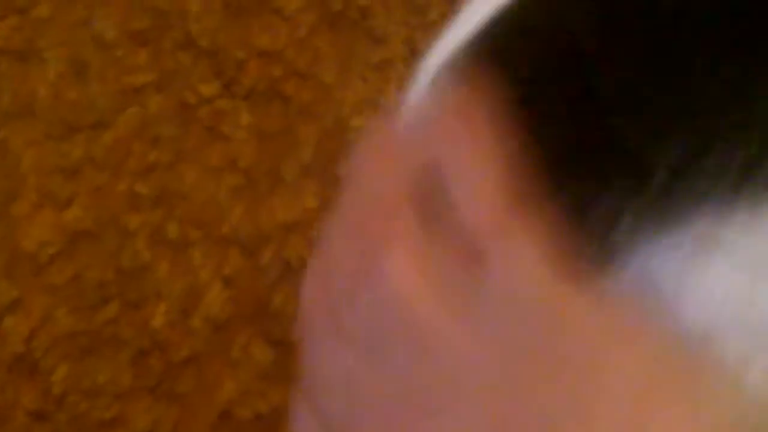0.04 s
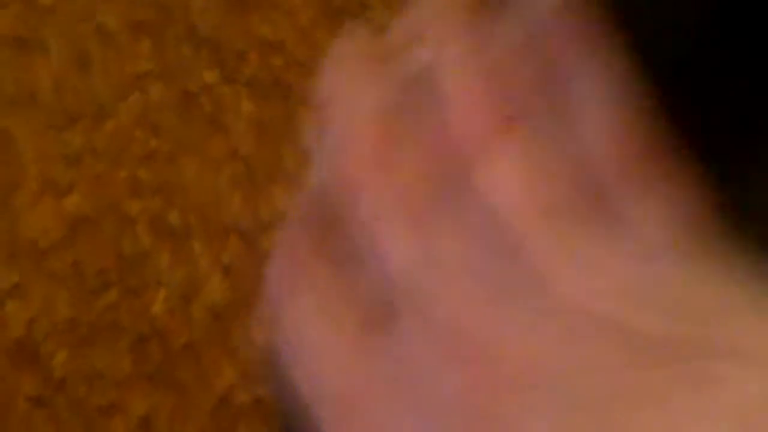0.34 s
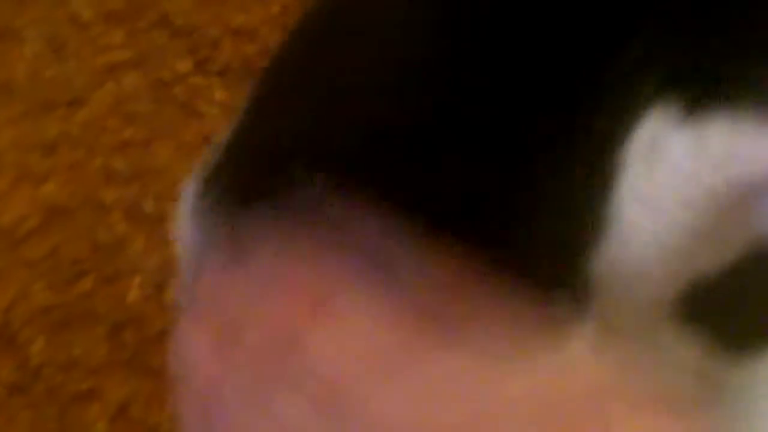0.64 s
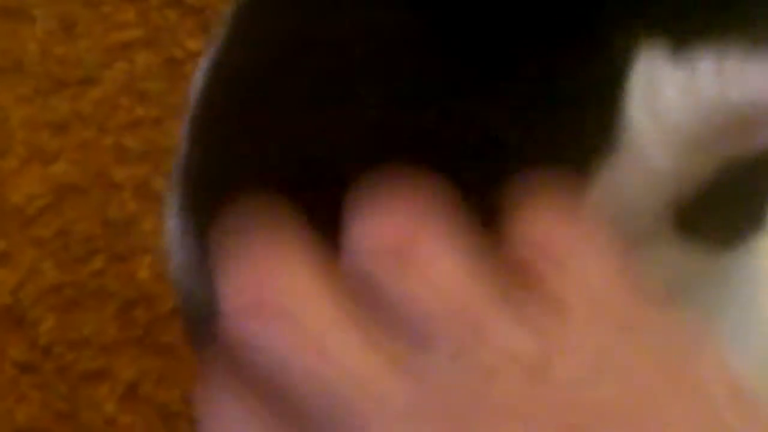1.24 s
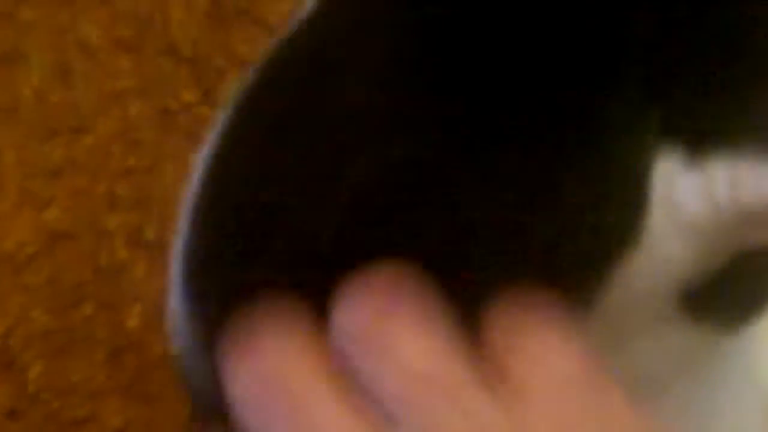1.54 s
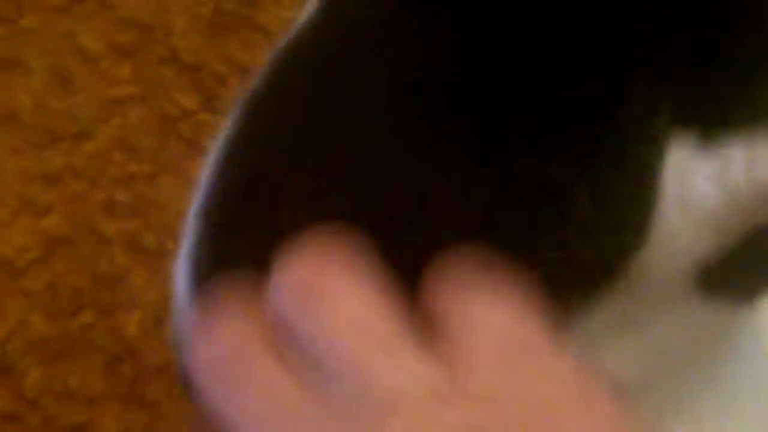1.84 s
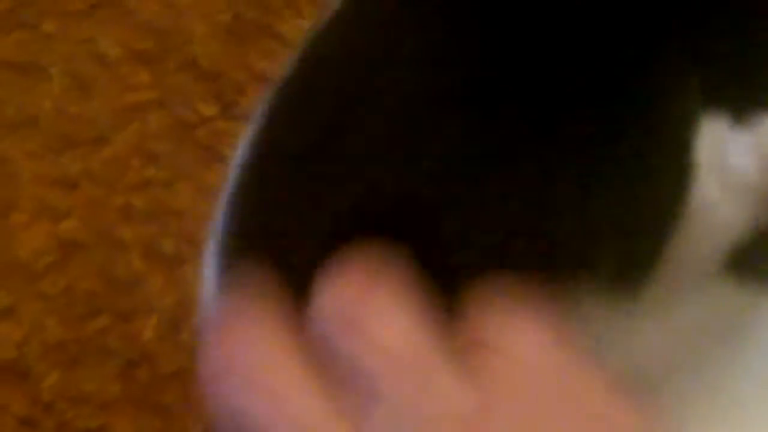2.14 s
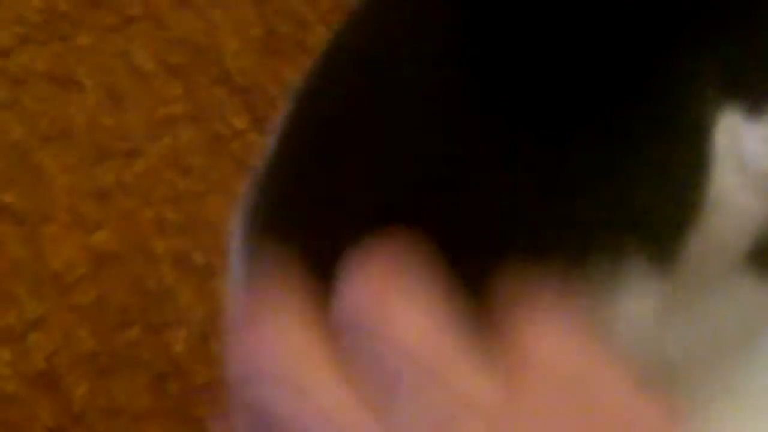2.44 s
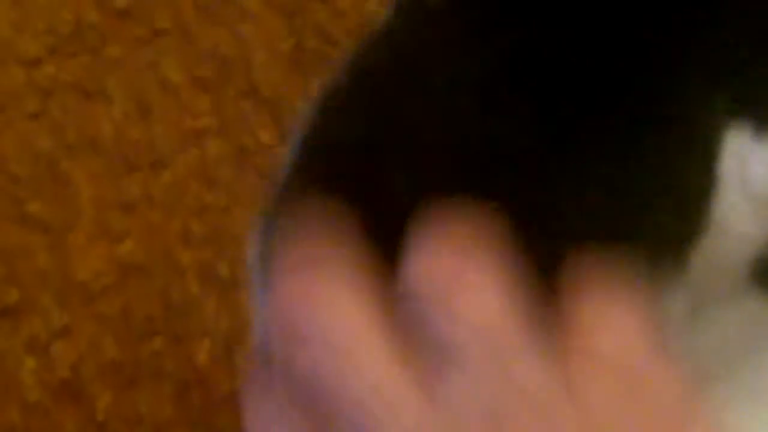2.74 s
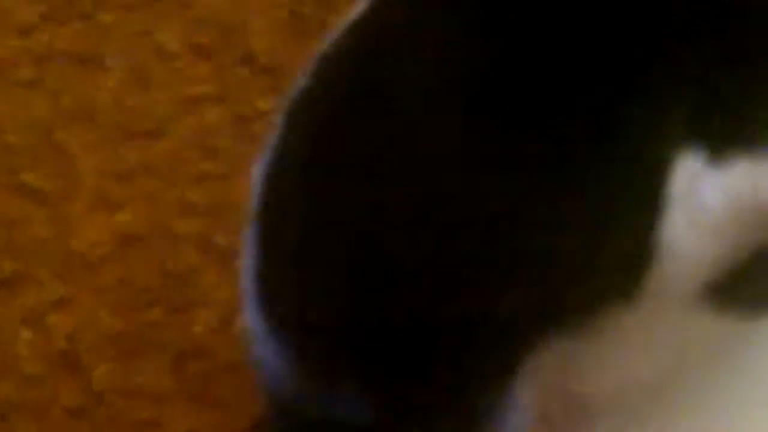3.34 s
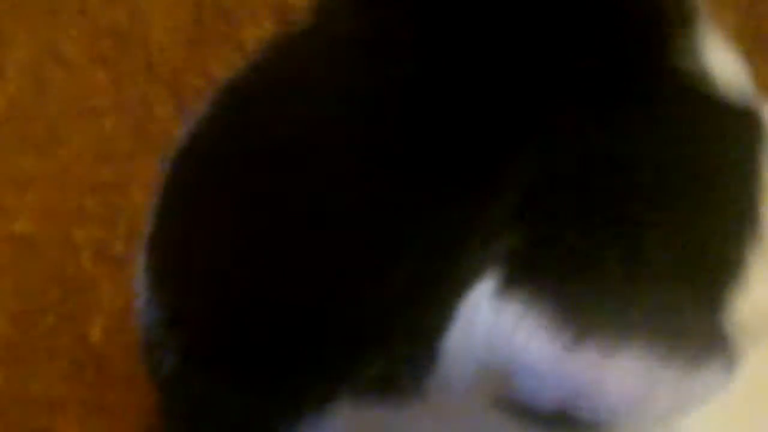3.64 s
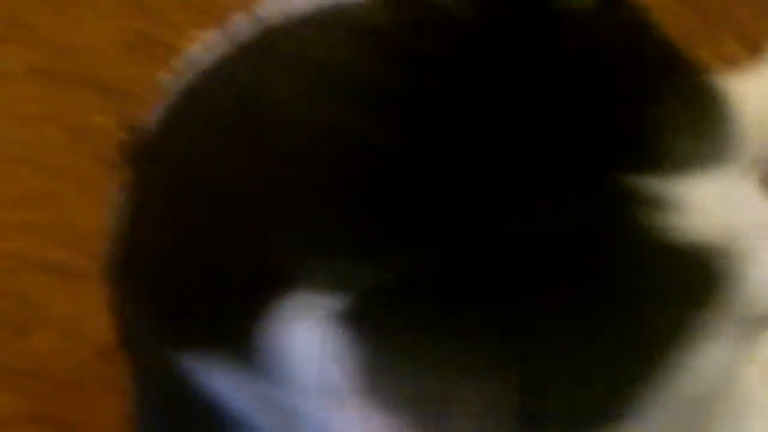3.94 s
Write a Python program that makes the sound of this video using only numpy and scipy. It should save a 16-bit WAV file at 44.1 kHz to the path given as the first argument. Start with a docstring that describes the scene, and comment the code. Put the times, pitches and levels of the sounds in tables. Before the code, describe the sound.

A hand rubs a cat's fur in quick, soft swishes close to a handheld microphone. A few dull bumps and pats come early, and small plastic ticks near the end, while an appliance hums faintly in a carpeted room.

```python
"""Soft swishes of fur, about seven a second: a hand rubs a cat's back to and fro, close to a handheld
camera. Hairs slide and flick under the fingers, the palm scuffs the coat, and hand and cat make a few
dull bumps and hollow pats. The camera's plastic case ticks in the grip, most clearly as the stroking
dies away. Behind it all, an appliance hums in the carpeted room."""
import sys
import numpy as np
from scipy import signal
from scipy.fft import rfft, irfft
from scipy.io import wavfile

SR = 44100
rng = np.random.default_rng(int(sys.argv[2]) if len(sys.argv) > 2 else 0)


def log_audio(samples):
    """Write samples as a 16-bit WAV file to the path given in sys.argv[1]."""
    # one column per channel
    frames = np.atleast_2d(samples).T
    # limit to full scale, then quantise
    limited = np.clip(frames, -1, 1)
    pcm = np.round(limited * 32767).astype(np.int16)
    wavfile.write(sys.argv[1], SR, pcm)


N = 176400
TIME_S, FREQ_HZ = np.arange(N) / SR, np.fft.rfftfreq(N, 1 / SR)


def amp(db):
    """Decibels to gain."""
    return 10 ** (np.asarray(db) / 20)


def unit_rms(x):
    """Scales to rms 1."""
    return x / np.sqrt(np.mean(x ** 2) + 1e-20)


def curve(points):
    """Joins a table's points across the spectrum on a log-frequency axis."""
    hz, value = np.transpose(points)
    return np.interp(np.log(FREQ_HZ + 1), np.log(hz + 1), value)


def equalise(x, eq):
    """Shapes a signal with an EQ curve."""
    return irfft(rfft(x) * amp(curve(eq)), N)


def drift(rate_hz):
    """Smooth random wander of rms 1."""
    return unit_rms(irfft(rfft(rng.standard_normal(N)) * np.exp(-(FREQ_HZ / rate_hz) ** 2), N))


def triggers(per_s, samples=N):
    """Single-sample triggers at random moments."""
    return rng.random(samples) < per_s / SR


def swell(middle_s, length_s, flatness=3.1):
    """One move of the hand gathers speed, peaks and slows; length_s is its width at half height."""
    return np.exp(-np.log(2) * abs(2 * (TIME_S - middle_s) / length_s) ** flatness)


def add(mix, start_s, sound):
    """Mixes a sound in at a time."""
    part = mix[max(round(start_s * SR), 0):][:len(sound)]
    part += sound[:len(part)]


# Tone of the air and hiss: freq_hz, gain_db
ROOM_EQ = [(5, -4), (28, -1.5), (45, -5.5), (75, -14.5), (170, -15.5), (270, -23.5), (450, -25.5),
           (580, -30), (820, -31), (1300, -36), (1850, -37), (2200, -38.5), (4000, -42), (6500, -39.5),
           (9000, -48), (12500, -50), (13300, -67), (15000, -63)]
# How alike left and right are: freq_hz, correlation (1 = mono)
ROOM_CORRELATION = [(50, 0.96), (170, 0.97), (350, 0.81), (700, 0.89), (1500, 0.96), (4000, 1), (7000, 1),
                    (12000, 0.67)]


def room_tone(level_db=-50.5):
    """Steady stereo air of the room, fading into microphone hiss at the top."""
    mid, side = rfft(rng.standard_normal((2, N)))
    correlation = curve(ROOM_CORRELATION)
    mid *= np.sqrt((1 + correlation) / 2)
    side *= np.sqrt((1 - correlation) / 2)
    air = irfft(np.array([mid + side, mid - side]), N)
    return amp(level_db) * unit_rms(equalise(air, ROOM_EQ))


# Motor and mains tones: pitch_hz, rms_db
HUM_TONES = [(46.8, -54), (58.4, -43), (102.3, -59), (120, -44), (145.6, -60), (204.8, -69.5), (233.3, -66),
             (307, -76.5), (410.5, -77.5), (442, -78.5), (467, -79.5), (817, -79.5), (1109, -83.5),
             (1750, -84.5), (1866, -81.5), (1924, -86)]


def appliance_hum(waver_db=1, waver_rad=0.092, whine_hz=7880, whine_db=-80.5):
    """Slightly wavering motor and mains tones under a thin electronic whine."""
    phase_per_hz, hum = 2 * np.pi * TIME_S, np.zeros(N)
    for hz, db in HUM_TONES:
        gain = amp(db + waver_db * drift(rate_hz=2.27))
        phase = hz * phase_per_hz + 2 * np.pi * rng.random()
        hum += gain * np.sin(phase + waver_rad * drift(rate_hz=2.5))
    whine = amp(whine_db) * np.sin(whine_hz * phase_per_hz)
    return np.sqrt(2) * (hum + whine)  # rms to peak


def handling_rumble(level_db=-48, cutoff_hz=34.5, waver_db=1):
    """Uneven low noise from the hand that holds the camera."""
    lows = signal.sosfilt(signal.butter(2, cutoff_hz, fs=SR, output="sos"), rng.standard_normal(N))
    return amp(level_db) * unit_rms(lows * amp(waver_db * drift(rate_hz=8.2)))


# Tone of the bounce off floor and furniture: freq_hz, gain_db
REFLECTION_EQ = [(30, -25), (120, -7), (300, 5), (2500, -4), (6000, -14), (14000, -15)]


def reflections(x, send_db=-4, t60_s=0.034, echoes_per_s=1500):
    """Early echoes make the short, dead tail of a carpeted room."""
    t = np.arange(SR // 5) / SR
    echoes = rng.choice([-1., 1.], len(t)) * triggers(echoes_per_s, len(t)) * amp(-60 * t / t60_s)
    echoes /= np.linalg.norm(echoes)
    return amp(send_db) * signal.fftconvolve(equalise(x, REFLECTION_EQ), echoes)[:N]


# Modes of the camera's case: pitch_hz, level_db, t60_s
CASE_MODES = [(1690, -7, 0.014), (2030, -1.5, 0.014), (2193, -3.5, 0.019), (3600, -10, .024),
              (6370, -4, 0.013), (7246, -14, 0.012)]


def case_ring():
    """The short ring of the plastic case."""
    t = np.arange(SR // 10) / SR
    return sum(amp(db - 60 * t / t60_s) * np.sin(2 * np.pi * hz * t) for hz, db, t60_s in CASE_MODES)


# Tone of the creak: freq_hz, gain_db
CREAK_EQ = [(300, 0), (660, 11), (1050, -3), (1550, 6), (2050, 5), (2800, -12), (3800, 7), (4600, -12),
            (7000, -8), (14000, -12)]


def grip_creak(peak_s=3.651, level_db=-49, build_s=0.011, release_s=0.0014, slips_per_s=700, spread_db=3):
    """The grip shifts: a run of dull slips builds up, rings the case and lets go."""
    t = TIME_S - peak_s
    slips = rng.choice([-1., 1.], N) * amp(spread_db * rng.standard_normal(N)) * triggers(slips_per_s)
    envelope = np.exp(np.minimum(t / build_s, -t / release_s))
    creak = equalise(signal.oaconvolve(slips * envelope, case_ring())[:N], CREAK_EQ)
    return amp(level_db) * creak * np.linalg.norm(envelope) / (np.linalg.norm(creak) + 1e-12)


# Ticks of the case: start_s, relative_level_db, centre_hz, half_width_octaves, ring_send_db
CASE_TICKS = [(0.5678, -45.5, 9000, 1.2, -8), (0.5682, -48, 1650, 0.46, -4),
              (.8795, -43.5, 5600, 0.52, -14), (0.884, -56, 4000, 1.5, -12), (1.1825, -48, 3200, 1, -15),
              (1.186, -49.5, 4500, 1.3, -13), (2.291, -53, 7000, 0.77, -1), (2.521, -52, 4000, 0.17, -14),
              (3.166, -51.5, 5470, 0.85, -11), (3.357, -51.5, 8000, 0.98, -7),
              (3.538, -53, 7000, 0.79, -12), (3.6144, -39.5, 7250, 0.43, 6.5), (3.6245, -53, 7000, 1, -10),
              (3.6455, -45, 1950, 0.56, 1), (3.6572, -48.5, 6700, 0.33, -1), (3.6655, -50, 2500, 1.3, -16),
              (3.816, -53.5, 7500, 0.56, 5.5), (3.8665, -36.5, 3880, 1.05, -7),
              (3.9905, -39, 2900, 0.27, -19), (3.9925, -38, 7460, .6, -3)]
# Tone of a tick before its band-pass: freq_hz, gain_db
TICK_EQ = [(200, -14), (900, 10.5), (1800, 0), (3200, 5.5), (4500, 1.5), (7200, 4.5), (9500, -2.5),
           (14000, -26)]


def case_ticks(snap_s=0.00092, rattle_s=0.0057, rattle_db=-4.5, ring_trim_db=-2, gain=0.5):
    """Plastic ticks in the grip: a snap, a brief rattle and the ring of the case."""
    t, out, ring = np.arange(SR // 10) / SR, np.zeros(N), case_ring()
    envelope = np.exp(-(t / snap_s) ** 2) + amp(rattle_db) * np.exp(-t / rattle_s)
    envelope_rms = np.sqrt(np.mean(envelope ** 2))
    for start_s, db, centre_hz, octaves, ring_send_db in CASE_TICKS:
        edges_hz = [centre_hz / 2 ** octaves, min(centre_hz * 2 ** octaves, SR / 2 - 1)]
        band = signal.butter(2, edges_hz, "band", fs=SR, output="sos")
        burst = equalise(rng.standard_normal(N), TICK_EQ)[:len(t)] * envelope
        snap = unit_rms(signal.sosfilt(band, burst)) * envelope_rms
        add(out, start_s, amp(db) * (snap + amp(ring_send_db + ring_trim_db) * ring))
    return gain * out


# Deep, soft bumps: start_s, level_db, pitch_hz, t60_s
SOFT_BUMPS = [(.178, -14.5, 32, 0.16), (.222, -16, 32, 0.14), (.697, -27, 12, 0.3), (2.422, -25, 27, 0.13)]


def bumps(rise_cycles=0.31):
    """Padded knocks of hand and cat that swing for a few cycles."""
    t, out = np.arange(SR // 2) / SR, np.zeros(N)
    for start_s, db, hz, t60_s in SOFT_BUMPS:
        attack = 1 - np.exp(-(t * hz / rise_cycles) ** 2)
        add(out, start_s, attack * amp(db - 60 * t / t60_s) * np.sin(2 * np.pi * hz * t))
    return out


# Pats of palm and fingertips: start_s, level_db, pitch_ratio, damping_ratio
HAND_PATS = [(.7115, -43, .85, 2.2), (0.7768, -36.5, 1.04, 1.2), (.792, -47.5, 2.27, 2.2),
             (1.129, -48, 1.9, 3), (2.4986, -47, 2.1, 4.6), (2.508, -51, 1.95, 2.7),
             (3.665, -41.5, 2.46, 3)]
# Hollow ring that each pat scales: base_pitch_hz, relative_level_db, base_t60_s
BODY_MODES = [(240, -2.5, 0.067), (334, -7, 0.045), (467, -1.5, 0.041), (727, -14.5, 0.032),
              (1030, -15, .025)]


def pats(rise_s=0.00047):
    """Flesh lands with a soft push that rings the hollow body underneath."""
    t, out = np.arange(SR // 5) / SR, np.zeros(N)
    attack = 1 - np.exp(-t / rise_s)
    for start_s, db, pitch_ratio, damping in HAND_PATS:
        ring = sum(amp(mode_db - 60 * t * damping / t60_s) * np.sin(2 * np.pi * hz * pitch_ratio * t)
                   for hz, mode_db, t60_s in BODY_MODES)
        add(out, start_s, amp(db) * attack * ring)
    return out


# Skin dragging over the coat: middle_s, length_s, level_db, centre_hz, width_hz
PALM_SCUFFS = [(0.034, 0.098, -66.5, 800, 900), (0.189, 0.054, -61.5, 750, 1500),
               (.27, 0.067, -68, 850, 700), (0.385, 0.11, -65, 1010, 350), (0.493, 0.11, -76, 1770, 700),
               (0.647, 0.057, -62.5, 870, 250), (0.785, .06, -69, 900, 1100), (0.766, .02, -60, 330, 400),
               (0.804, 0.053, -55, 367, 330), (0.878, 0.061, -69, 1020, 600), (1.144, 0.033, -62, 835, 400),
               (1.198, 0.047, -63.5, 1920, 600), (1.344, 0.19, -69, 1680, 500),
               (1.78, 0.066, -66.5, 730, 400), (2.122, 0.062, -73, 1500, 1400),
               (2.298, 0.017, -61.5, 1520, 900), (2.514, 0.036, -58.5, 850, 900),
               (2.61, 0.067, -70, 750, 400), (3.214, 0.028, -62.5, 746, 400), (3.482, 0.2, -65, 350, 300),
               (3.658, 0.064, -67, 680, 250), (3.86, 0.052, -63, 2030, 800)]


def scuffs(roughness_db=2.0):
    """Duller, uneven rubbing where the palm presses harder."""
    out = np.zeros(N)
    friction_spectrum = rfft(rng.standard_normal(N) * amp(roughness_db * drift(rate_hz=120)))
    for middle_s, length_s, db, centre_hz, width_hz in PALM_SCUFFS:
        band = 1 / (1 + (2 * (FREQ_HZ - centre_hz) / width_hz) ** 2)
        out += amp(db) * swell(middle_s, length_s) * unit_rms(irfft(friction_spectrum * band, N))
    return out


# Tone of the crackle: freq_hz, gain_db
CRACKLE_EQ = [(500, -25), (2500, -5), (7000, 0), (10000, -6), (15000, -22)]


def hair_crackle(strokes, relative_db=-13.5, snaps_per_s=90, spread_db=6.0):
    """Now and then a stiffer hair springs free under a stroke."""
    pressure = sum(amp(db) * swell(middle_s, length_s) for middle_s, length_s, db, _ in strokes)
    snaps = rng.choice([-1., 1.], N) * amp(spread_db * np.minimum(rng.exponential(1, N), 3))
    snaps *= triggers(snaps_per_s)
    return amp(relative_db) * pressure * unit_rms(equalise(snaps, CRACKLE_EQ))


# Strokes through the fur: middle_s, length_s, level_db, brightness_db (cuts lows, lifts highs by half)
FUR_STROKES = [(0.01, 0.11, -64.5, -5), (.18, 0.17, -68.5, -3), (0.285, 0.038, -58, -1.5),
               (0.347, 0.091, -68, -6.5), (0.446, 0.14, -64.5, -2.5), (0.537, 0.059, -68, 2),
               (0.669, .12, -60, -0.5), (0.787, 0.081, -60, -2.5), (0.86, 0.1, -60.5, -0.5),
               (1.016, 0.075, -62, 4), (1.171, 0.1, -61.5, -0.5), (1.306, 0.066, -62, 0.5),
               (1.45, .11, -66, 2), (1.611, 0.073, -60.5, 1), (1.756, 0.11, -64.5, 2),
               (1.918, 0.076, -61, 2.5), (2.045, 0.064, -67, 1), (2.11, 0.046, -69, -5),
               (2.203, 0.055, -61, 3), (2.293, 0.036, -67.5, 10), (2.36, .09, -65, 0),
               (2.482, 0.07, -61, 0.5), (2.597, 0.11, -70, -2), (2.662, 0.081, -67, 7),
               (2.793, 0.053, -63.5, 10), (2.967, .12, -66, 6), (3.099, 0.07, -61, 0.5),
               (3.253, 0.11, -65, 3), (3.403, 0.091, -61.5, 2.5), (3.483, .06, -69.5, 8),
               (3.67, 0.2, -66, -0.5), (3.805, 0.3, -71, -3)]
# Tone of the sliding hairs: freq_hz, gain_db
FUR_EQ = [(100, -6), (400, 7), (900, -2), (1400, 0.5), (2600, -1), (4400, 1), (6500, 4), (9700, -4),
          (12000, -12), (15000, -22)]


def fur_swishes(flicks_per_s=1300, flick_db=-7, spread_db=3.5, crossover_hz=5500):
    """Countless hairs slide and flick under the fingers; each stroke has its own level and brightness."""
    flicks = rng.standard_normal(N) * amp(spread_db * np.minimum(rng.exponential(1, N), 4))
    flicks *= triggers(flicks_per_s)
    swish = unit_rms(equalise(rng.standard_normal(N) + amp(flick_db) * unit_rms(flicks), FUR_EQ))
    lows = signal.sosfiltfilt(signal.butter(2, crossover_hz, fs=SR, output="sos"), swish)
    highs = swish - lows
    low_power, high_power = np.zeros((2, N))
    for middle_s, length_s, db, brightness_db in FUR_STROKES:
        envelope = amp(db) * swell(middle_s, length_s)
        low_power += (envelope * amp(-brightness_db)) ** 2
        high_power += (envelope * amp(brightness_db / 2)) ** 2
    return lows * np.sqrt(low_power) + highs * np.sqrt(high_power)


def scene():
    """Hand, cat and camera sit close and centred in the humming room; only the knocks echo."""
    knocks = bumps() + pats() + case_ticks() + grip_creak()
    stroking = fur_swishes() + hair_crackle(FUR_STROKES) + scuffs()
    return stroking + knocks + reflections(knocks) + handling_rumble() + appliance_hum() + room_tone()


# Steady offset of the inputs, left then right: offset_full_scale
DC_OFFSET = [
    [-0.0089],
    [0.024],
]


def record(dry):
    """The microphone cuts a deep notch in the treble; a band limit and the input offset follow."""
    notch_hz, notch_width_hz, notch_leak, cutoff_hz = 5408, 1630, 0.035, 15100
    notched = signal.lfilter(*signal.iirnotch(notch_hz, notch_hz / notch_width_hz, SR), dry)
    notched += notch_leak * (dry - notched)
    lowpass = signal.firwin(511, cutoff_hz, window=("kaiser", 9), fs=SR)
    return signal.oaconvolve(notched, lowpass[None], "same") + np.array(DC_OFFSET)


dry = scene()
out = record(dry)
log_audio(out)
```